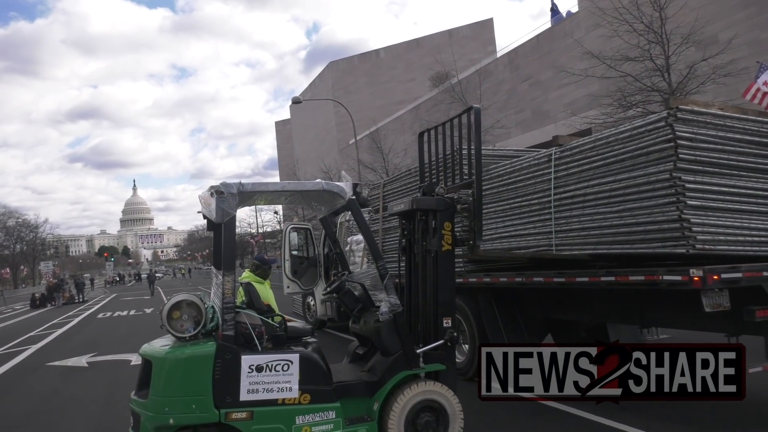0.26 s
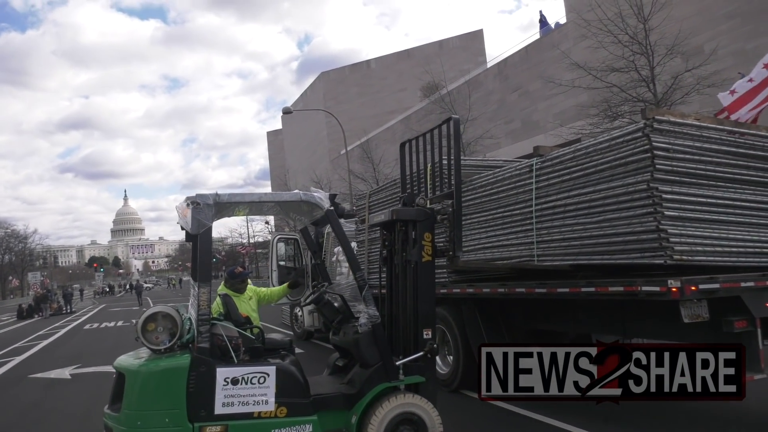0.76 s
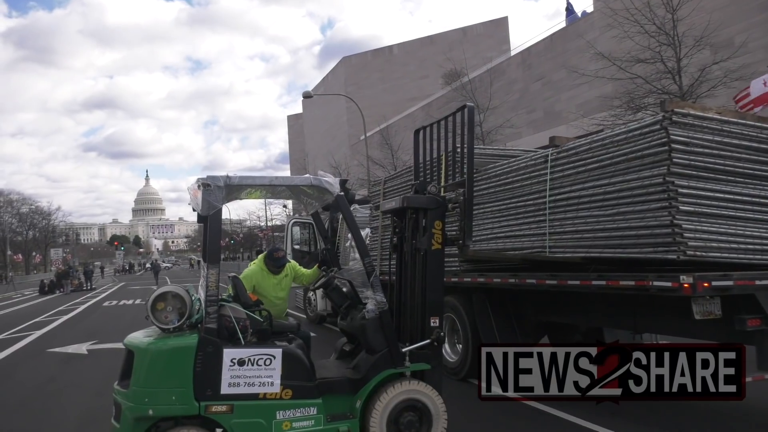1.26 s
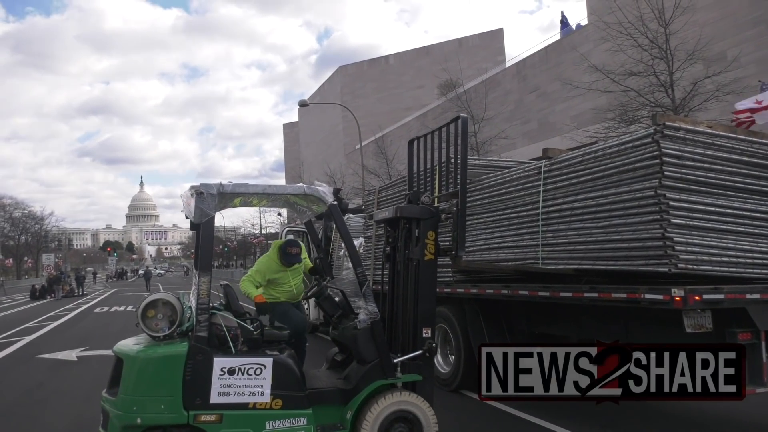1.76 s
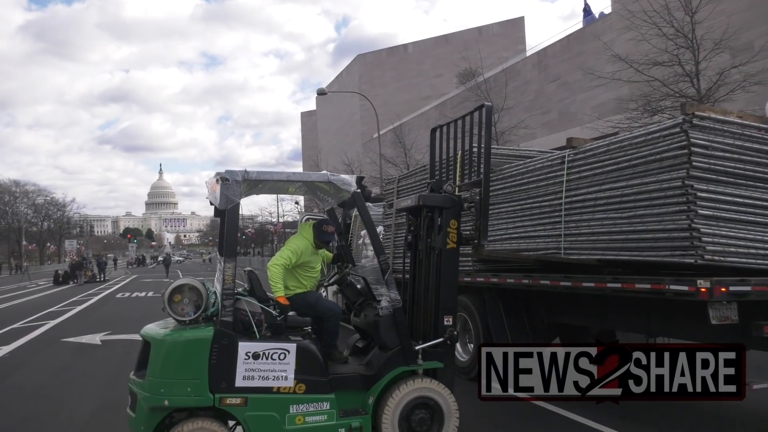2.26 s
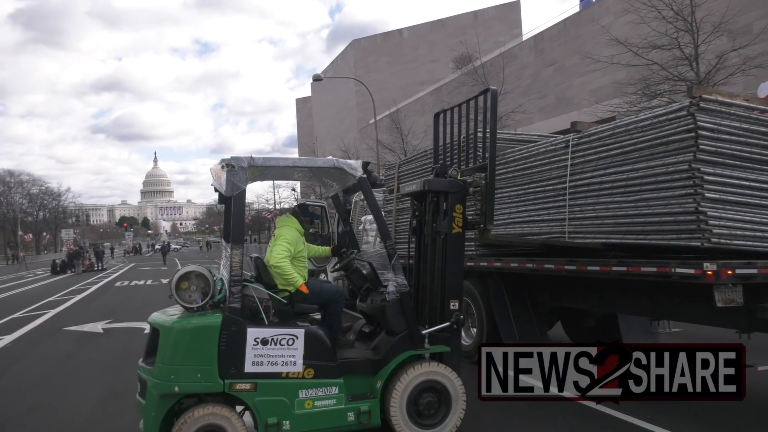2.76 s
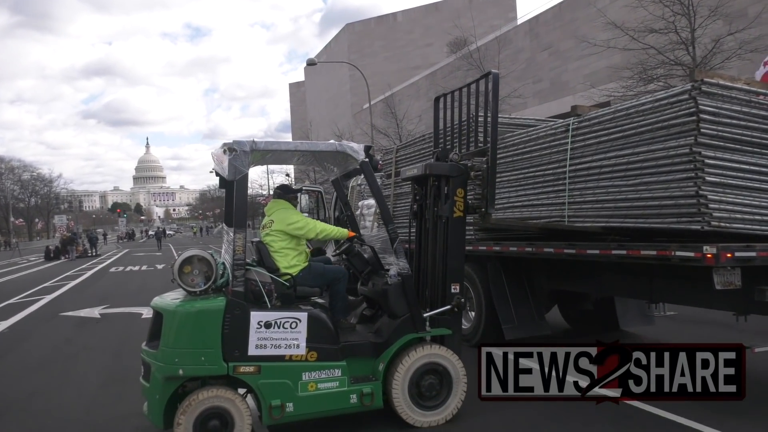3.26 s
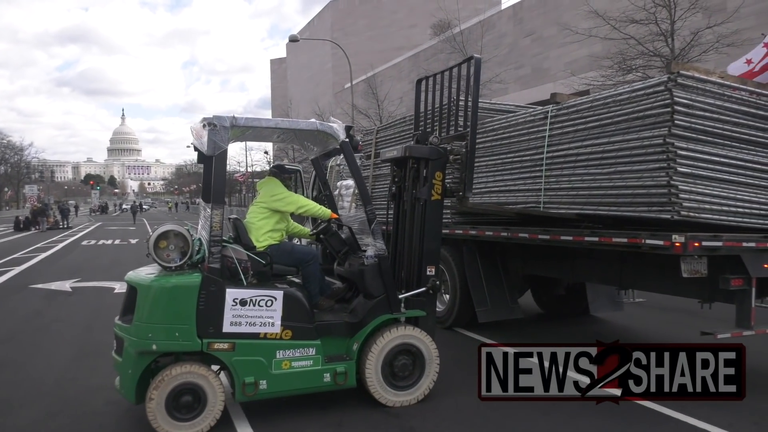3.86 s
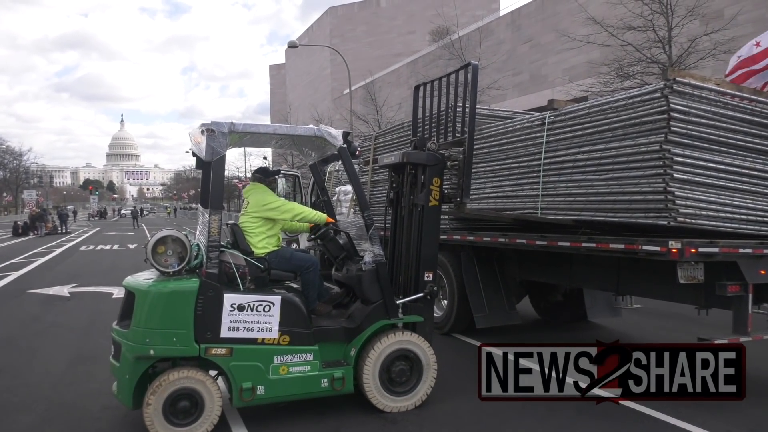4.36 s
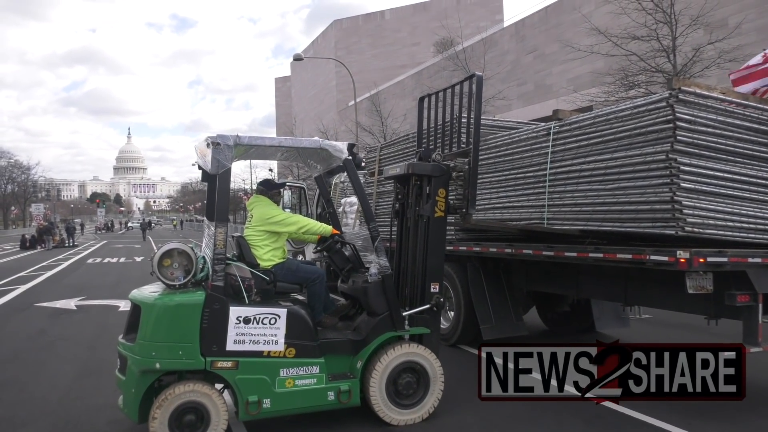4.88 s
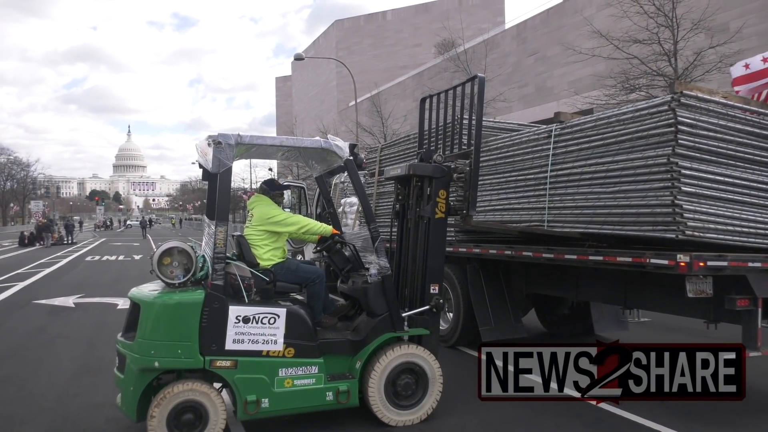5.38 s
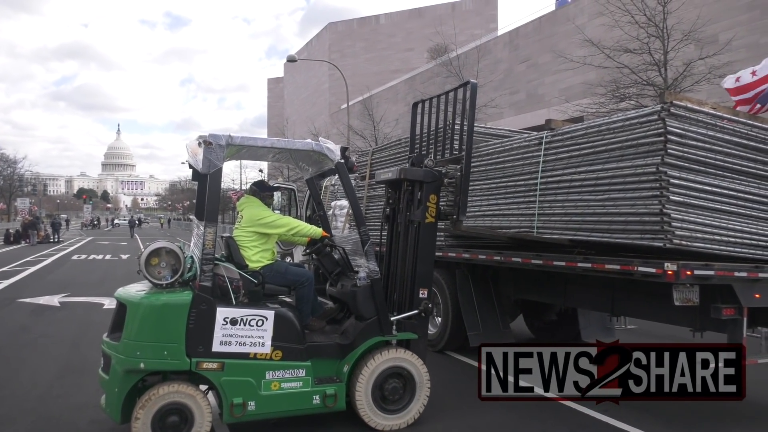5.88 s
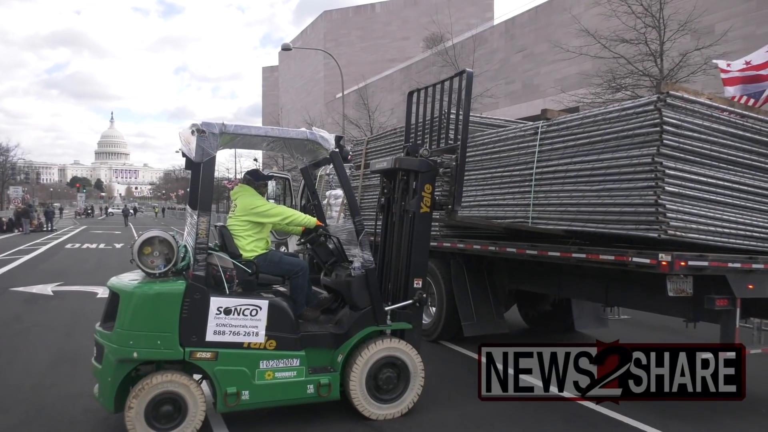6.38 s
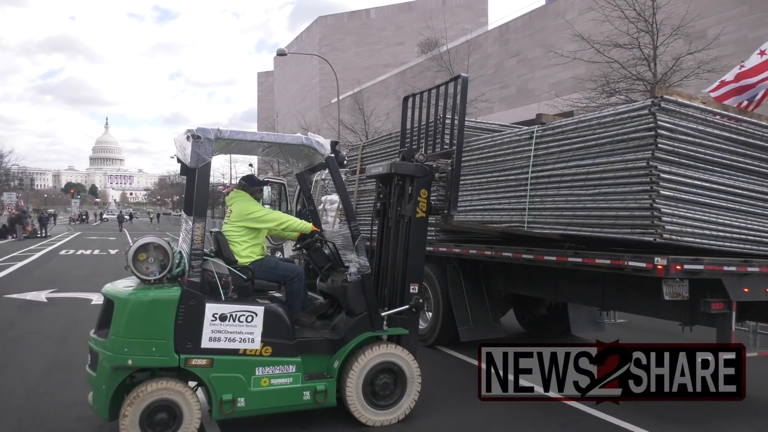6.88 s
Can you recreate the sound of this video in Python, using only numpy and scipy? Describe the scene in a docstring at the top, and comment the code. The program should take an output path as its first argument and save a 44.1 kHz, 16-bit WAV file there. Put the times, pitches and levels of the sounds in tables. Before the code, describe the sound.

A forklift idles a few metres away on an open street, its engine clattering steadily under a hydraulic whine. A brief high squeak comes at the start, then one sharp click, and later a few soft clanks of loose steel. The whine brightens with a faint whistle, then sags slightly under load near the end. Gusts of wind thump and rumble on the microphone throughout.

```python
"""An open street, a few metres from an idling propane forklift.
Its twelve-tooth hydraulic pump whines over the engine's clatter: the whine brightens as oil flows,
then sags under load, and the open valve whistles faintly. A brief squeak, one sharp click and a few
soft clanks of loose steel stand out. Gusts buffet the microphone throughout."""
import sys
import numpy as np
from scipy import signal
from scipy.fft import rfft, irfft
from scipy.io import wavfile
from scipy.ndimage import uniform_filter1d, minimum_filter1d

SR = 44100
rng = np.random.default_rng(int(sys.argv[2]) if len(sys.argv) > 2 else 0)


def unload_wav(signal):
    """Save mono or channel-first audio to the path in sys.argv[1] as 16-bit WAV at rate SR, clipped to [-1, 1]."""
    wavfile.write(
        sys.argv[1],
        SR,
        np.round(np.clip(np.atleast_2d(signal).T, -1, 1) * 32767).astype(np.int16),
    )


N = 314433
TIME = np.arange(N) / SR
FREQ = np.maximum(np.arange(N // 2 + 1) * SR / N, 1)
TEETH_PER_FIRING = 6


# Partials of the pump's whine: {tooth_harmonic: level_db}
WHINE_PARTIALS = {2: -45, 4: -54, 7: -54, 8: -46.5, 12: -58.5, 13: -53.5, 14: -54, 15: -61, 16: -53.5, 18:
                  -59.5, 19: -56, 20: -54, 21: -62.5, 22: -58.5, 23: -60, 24: -61.5, 25: -65, 26: -70.5, 27:
                  -58.5, 28: -62.5, 29: -58, 31: -60, 32: -62, 33: -62, 37: -66, 41: -71.5, 43: -72.5, 50:
                  -67, 55: -63, 58: -75}
# Three EQs on the whine, faded in by flow, load and throttling: centre_hz, width_hz, gain_db
FLOW_EQ = [(7300, 530, 11.5), (4350, 550, 5.5), (2990, 800, -7), (1410, 72, 3.5), (340, 60, -4)]
LOAD_EQ = [(2370, 147, 7.5), (2640, 120, 12), (1230, 270, 5), (3050, 200, -10), (4530, 93, 1),
           (3580, 393, 7), (5530, 700, -1.5)]
THROTTLE_EQ = [(4837, 200, 5.5), (4350, 150, -15), (4000, 300, -15)]

def pump(teeth, gain_db=-0.32, flicker_db=1.6, blur_rad=.016):
    """Meshing teeth sing a harmonic whine; turbulent oil blurs the higher partials more."""
    step = 441  # the EQ updates every 10 ms
    flow, load, throttle = hydraulics()[:, ::step]
    tooth_hz = curves(PUMP_SPEED)[0][::step]
    out = 0
    for k, db in WHINE_PARTIALS.items():
        hz = k * tooth_hz
        eq_db = flow * bumps(hz, FLOW_EQ) + load * bumps(hz, LOAD_EQ) + throttle * bumps(hz, THROTTLE_EQ)
        phase = 2 * np.pi * (k * teeth + rng.random()) + blur_rad * k * walk(50)
        level_db = db + np.interp(TIME, TIME[::step], eq_db) + flicker_db * walk(27)
        out = out + undb(level_db) * np.sin(phase)
    return np.sqrt(2) * undb(gain_db) * out


# Pump speed, sagging as the hydraulics take load: time_s, tooth_rate_hz
PUMP_SPEED = [(0.0, 168.9), (0.08, 170.2), (1.37, 170.8), (1.41, 170.2), (1.67, 172.1), (1.95, 169.2),
              (2.36, 170.6), (3.79, 170.2), (3.95, 169.0), (4.39, 171), (5.44, 171.2), (5.48, 169.7),
              (5.72, 171.1), (5.9, 168.2), (6.61, 169.3), (7.13, 164)]

def shaft(kick=.0055, wander=.0008):
    """Pump teeth passed so far; each firing kicks the shaft ahead, and no two burns are equal."""
    tooth_hz, = curves(PUMP_SPEED)
    firings = np.cumsum(tooth_hz) / SR / TEETH_PER_FIRING
    wobble = 1 + kick * np.sin(2 * np.pi * firings) + wander * walk(22.5)
    return np.cumsum(tooth_hz * wobble) / SR


# Moves of the hydraulic lever: start_s, end_s, flow_share, load_share, throttle_share
LEVER_STROKES = [(-.2, 0.456, 0.5, 0, 0), (2.8, 5.805, 1, 0.33, 0.24), (5.79, 6.813, 0.53, 0.8, 0.5),
                 (6.803, 7.4, 0.3, 0.2, 0.8)]

def hydraulics(ramp_s=0.16):
    """Oil flow, load and throttling, 0 to 1: each stroke ramps in, holds and ramps out."""
    held = 0
    for start, end, *setting in LEVER_STROKES:
        opening = np.clip(np.minimum(TIME - start, end - TIME) / ramp_s + .5, 0, 1)
        held = held + np.outer(setting, opening)
    return np.clip(held, 0, 1)


# Tone of the engine clatter and fan rush: frequency_hz, density_db
ENGINE_SPECTRUM = [(40, -52), (150, -68), (330, -67), (500, -68.5), (880, -68.5), (1500, -69), (1850, -75),
                   (2300, -73.5), (3000, -81.5), (4200, -85.5), (5200, -82.5), (7600, -93.5), (9600, -89.5),
                   (11000, -93.5)]
# Top-end roll-off, shared with the clanks: frequency_hz, gain_db
TOP_ROLLOFF = [(11000, 0), (11700, -6), (13500, -14), (15700, -18)]
# Ring of the hood panels: centre_hz, width_hz, gain_db
HOOD_RESONANCES = [(1068, 140, 5), (1090, 74, 1.5), (1333, 30, 3.5)]
# Slow change in the treble as the forklift turns: time_s, gain_db
TREBLE_RIDE = [(0, 1.8), (1.1, 2.5), (2.5, 1), (3.6, -2.1), (5.6, -0.8), (7.13, 0)]

def engine(teeth, throb=0.04, body_load_db=-1.0, clatter_load_db=2.5):
    """Hood noise swells with each firing; valve gear clatters, harder under load; oil hisses on top."""
    _, load, _ = hydraulics()
    treble_db, = curves(TREBLE_RIDE)
    colour = contour(ENGINE_SPECTRUM) + contour(TOP_ROLLOFF) + bumps(FREQ, HOOD_RESONANCES)
    above_body, above_clatter = (1 / (1 + (hz / FREQ) ** 6) for hz in (1800, 4800))
    body = noise(colour + 10 * np.log10(1 - above_body))
    body *= undb(0.03 + body_load_db * load + 0.3 * walk(22))
    clatter = noise(colour + 10 * np.log10(above_body - above_clatter))
    clatter *= undb(-0.07 + clatter_load_db * load + 0.63 * treble_db + 1.15 * walk(27))
    hiss = reflected(colour + 10 * np.log10(above_clatter))
    hiss *= undb(treble_db + 0.65 * walk(13))
    firing_pulse = 1 + throb * np.cos(2 * np.pi * teeth / TEETH_PER_FIRING)
    return (body + clatter + hiss) * firing_pulse


def reflected(density_db, ripple_db=5.0, spacing_hz=95, count=5):
    """Noise rippled by reflections off steel and road; the ripple changes as the microphone drifts."""
    out = 0
    for k in range(count):
        ripple = np.interp(FREQ / spacing_hz, np.arange(600), rng.standard_normal(600))
        crossfade = np.clip(1 - np.abs(np.linspace(0, count - 1, N) - k), 0, 1)
        out = out + np.sqrt(crossfade) * noise(density_db + ripple_db * ripple)
    return out


# Low drone of the crankshaft: {firing_harmonic: level_db}
HUM_PARTIALS = {1: -41, 2: -46, 3: -45, 4: -51, 8: -47, 10: -49, 23: -58}

def hum(teeth, fan_mean_hz=213.8, fan_db=-45, waver_db=2.5):
    """Low firing harmonics and the belt-driven fan's blade tone, all following the shaft."""
    tones = [(k * teeth / TEETH_PER_FIRING, db) for k, db in HUM_PARTIALS.items()]
    tones.append((fan_mean_hz * N / SR * teeth / teeth[-1], fan_db))
    return sum(undb(db + waver_db * walk(1.4)) * np.sin(2 * np.pi * (cycles + rng.random()))
               for cycles, db in tones)


def whistle(pitch_hz=4593, half_width_hz=21, level_db=-57):
    """Oil rushing through the open valve whistles at one pitch, whatever the shaft speed."""
    flow, _, _ = hydraulics()
    tone = noise(-20 * np.log10(1 + ((FREQ - pitch_hz) / half_width_hz) ** 2))
    return tone / tone.std() * flow * undb(level_db)


# Glide and envelope of the squeak: time_s, pitch_hz, level_db
SQUEAK_GLIDE = [(.055, 3790, -63.5), (.075, 3750, -42), (.086, 3710, -39), (.098, 3650, -41),
                (.125, 3560, -51), (.145, 3580, -60.5)]

def squeak(octave_db=-9, waver=0.0078, rough_db=3):
    """A short, rough falling squeak with its octave."""
    hz, db = curves(SQUEAK_GLIDE)
    phase = 2 * np.pi * np.cumsum(hz * (1 + waver * walk(300))) / SR
    tone = np.sin(phase) + undb(octave_db) * np.sin(2 * phase)
    gate = (TIME > SQUEAK_GLIDE[0][0]) & (TIME < SQUEAK_GLIDE[-1][0])
    return gate * undb(db + rough_db * walk(150)) * tone


# One click and its bounces: peak_s, level_db, pitch_hz, half_length_s
CLICK_HITS = [(0.7116, -23, 2190, 0.00034), (0.7143, -14, 2920, 0.00026), (0.7147, -24, 2750, 0.00034),
              (0.721, -28, 2600, 0.00035)]

def click():
    """A hard little contact that rings for a couple of cycles and bounces."""
    return sum(undb(db) * np.exp(-((TIME - s) / half_s) ** 2) * np.cos(2 * np.pi * hz * (TIME - s))
               for s, db, hz, half_s in CLICK_HITS)


# Soft steel clanks: start_s, level_db, centre_hz, t60_s
CLANK_HITS = [(2.08, -35, 798, .12), (2.102, -31.5, 1500, 0.16), (2.125, -40, 4400, 0.1),
              (2.165, -36, 1400, 0.083), (2.395, -34, 2100, .09), (3.58, -33, 1815, 0.078),
              (3.786, -37, 3600, 0.058)]

def clanks(octave_fall_db=11, attack_s=.002):
    """Loose steel shifts: short bursts of dense ringing."""
    out = 0
    for start, db, hz, t60 in CLANK_HITS:
        ring = noise(contour(TOP_ROLLOFF) - octave_fall_db * np.log2(FREQ / hz) ** 2)
        age = np.clip(TIME - start, 0, 10 * t60)
        envelope = np.minimum(age / attack_s, 1) * undb(db - 60 * age / t60)
        out = out + ring / ring.std() * envelope
    return out


# Tone of the wind on the microphone, before its bands are levelled: frequency_hz, relative_db
WIND_SPECTRUM = [(6, -11.5), (14, 4), (28, -3), (50, -3), (80, -7.5), (130, -13), (200, -16), (300, -22),
                 (450, -31), (800, -42.5), (2000, -68), (16000, -125)]
# Rise and fall of the gusts: time_s, strength_db
GUST_RIDE = [(0.0, -20.5), (0.18, -16), (0.4, -18.5), (0.7, -21.0), (0.93, -16.0), (1.3, -20.5),
             (1.62, -29.0), (1.95, -27), (2.13, -20), (2.42, -27), (2.75, -26.5), (3.05, -32.5),
             (3.55, -22), (3.75, -21.5), (4.2, -16.5), (4.65, -17), (5.6, -17), (7.13, -21.5)]
# Eddy size, from big and thumping (below 0) to small and fluttering (above 0): time_s, tilt_db
EDDY_BALANCE = [(0, 0), (1.3, -2), (2.6, 0), (3.9, 2.5), (4.35, -1.5), (5.0, 3.5), (5.8, 2.5), (7.13, 2.5)]
# Single heavy buffets that push the thump: peak_s, half_length_s, boost_db
HEAVY_BUFFETS = [(1.06, .06, 3.5), (1.25, 0.073, 3), (1.548, .07, 6), (3.556, 0.027, 11), (4.134, 0.026, 5),
                 (4.48, 0.03, 7)]

def wind(usual_db=-19, thump_db=3.5, rumble_db=-0.47, flutter_db=-10.0, steadiness=0.79):
    """Big eddies thump, smaller ones rumble, the smallest flutter; gusts feed the smallest most."""
    gust = curves(GUST_RIDE)[0] - usual_db
    tilt, = curves(EDDY_BALANCE)
    buffets = sum(db * np.exp(-((TIME - s) / half_s) ** 2) for s, half_s, db in HEAVY_BUFFETS)
    above_thump, above_rumble = (1 / (1 + (hz / FREQ) ** 10) for hz in (52, 150))
    bands = [(1 - above_thump, thump_db + 0.84 * gust - tilt + buffets + 1.5 * walk(9.2)),
             (above_thump - above_rumble, rumble_db + gust + 1.42 * walk(14)),
             (above_rumble, flutter_db + 1.08 * gust + tilt + 1.05 * walk(28))]
    out = 0
    for share, db in bands:
        band = noise(contour(WIND_SPECTRUM) + 10 * np.log10(np.maximum(share, 1e-15)))
        # within a gust the air pushes fairly evenly, so compress the band's own swells
        swell = uniform_filter1d(band ** 2, size=4000) / band.var()
        band = band / np.maximum(swell, 1e-6) ** (steadiness / 2)
        out = out + band / band.std() * undb(usual_db + db)
    edge_fade = np.minimum(np.minimum(TIME, TIME[::-1]) / .005, 1)
    return out * edge_fade


def undb(db):
    """Decibels to gain."""
    return 10 ** (np.asarray(db) / 20)


def curves(table):
    """Each column of a timed table as an automation curve, sample by sample."""
    times, *columns = np.transpose(table)
    return [np.interp(TIME, times, column) for column in columns]


def contour(points):
    """A spectrum in dB through (frequency_hz, level_db) points."""
    hz, db = np.transpose(points)
    return np.interp(np.log(FREQ), np.log(hz), db)


def bumps(hz, peaks):
    """The dB that a set of bell-shaped boosts and cuts adds at these frequencies."""
    return sum(db / (1 + (2 * (hz - centre) / width) ** 2) for centre, width, db in peaks)


def noise(density_db):
    """Noise with the given power per hertz."""
    return irfft(rfft(rng.standard_normal(N)) * undb(density_db), N) * np.sqrt(SR / 2)


def walk(rate_hz):
    """A smooth random wander with spread 1, up to about rate_hz."""
    knots = rng.standard_normal(16384)
    lowpass = np.exp(-(FREQ[:len(knots) // 2 + 1] / rate_hz) ** 2)
    knots = irfft(rfft(knots) * lowpass)
    wander = np.interp(TIME, np.linspace(0, N / SR, len(knots)), knots)
    return wander / wander.std()


def scene(left_db=2.5, right_db=-3.52):
    """One microphone feeds both channels, the right one at half the gain."""
    teeth = shaft()
    mono = engine(teeth) + hum(teeth) + pump(teeth) + wind() + whistle() + click() + clanks() + squeak()
    return undb([[left_db], [right_db]]) * mono


def record(dry, top_hz=15700):
    """A limiter eases the strongest buffets under full scale, and the top is cut."""
    safe_gain = 1 / np.maximum(np.abs(dry).max(axis=0), 1)
    gain = uniform_filter1d(minimum_filter1d(safe_gain, size=441), size=441)
    lowpass = signal.ellip(10, .1, 90, top_hz, fs=SR, output="sos")
    return signal.sosfilt(lowpass, gain * dry)


dry = scene()
out = record(dry)
unload_wav(out)
```